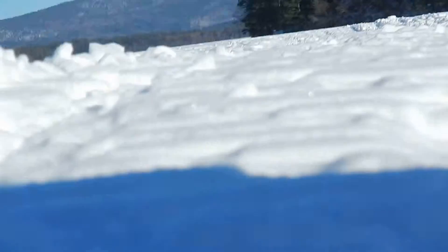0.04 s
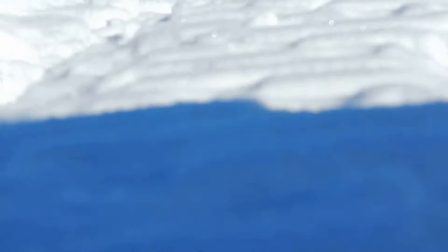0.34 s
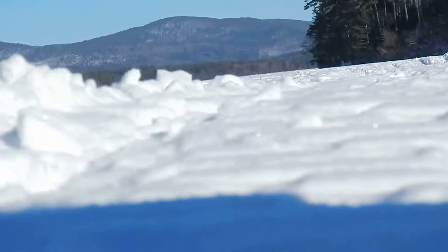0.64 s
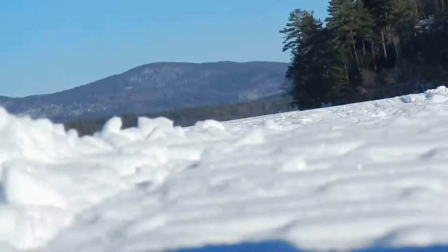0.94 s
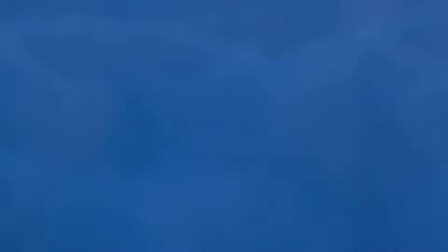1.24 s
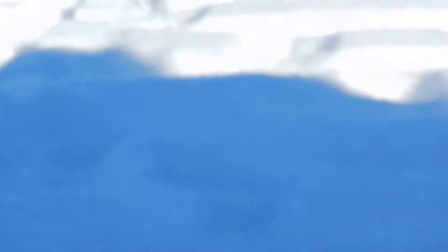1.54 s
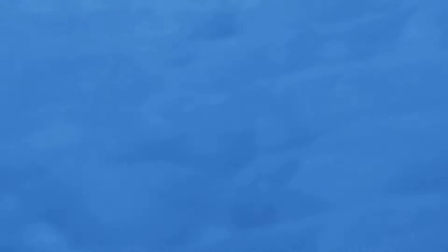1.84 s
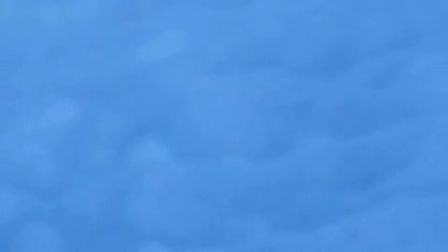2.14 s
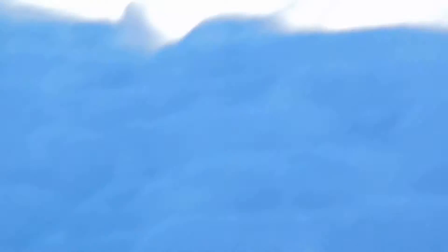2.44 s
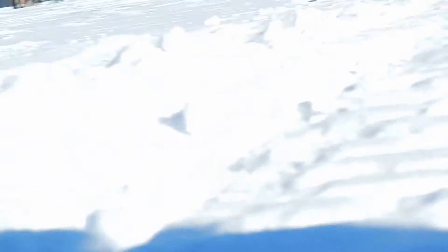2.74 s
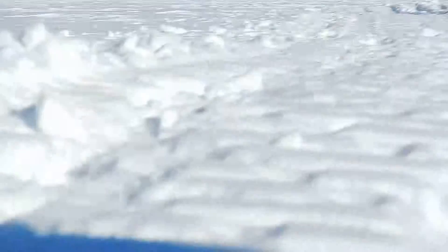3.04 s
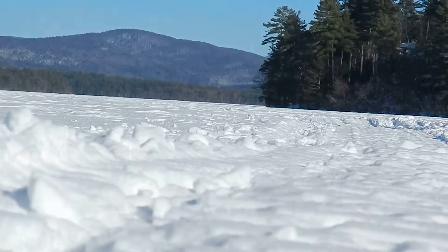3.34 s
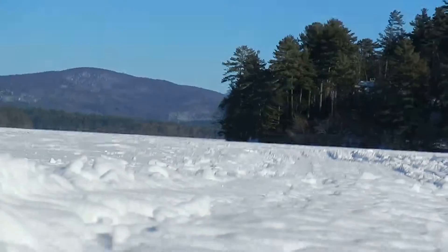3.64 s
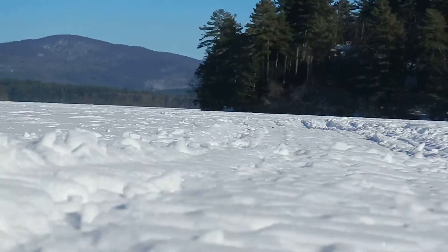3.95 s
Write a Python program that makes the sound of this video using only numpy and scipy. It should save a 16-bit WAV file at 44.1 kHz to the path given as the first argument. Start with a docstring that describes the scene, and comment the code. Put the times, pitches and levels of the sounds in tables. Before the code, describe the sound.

Close crunching footsteps in snow, with rustling clothes and a distant idling engine.

```python
"""Boots crunch in cold snow on a frozen lake, close to a hand-held camera; clothing rustles, and a low
throb, probably a distant idling engine, runs throughout under light wind. In the first second the snow
fractures and squeals underfoot, and faint lens peeps begin. After a lull in the steps, fingers click on
the case at about 2 s; the engine starts to lope and misfires three times as the boots scuff again.
A few softer steps end the scene. All is heard through the notched colour of the microphone ports."""
import sys
import numpy as np
from scipy import signal
from scipy.fft import rfft, irfft
from scipy.io import wavfile
from scipy.ndimage import uniform_filter1d

SR = 44100
rng = np.random.default_rng(int(sys.argv[2]) if len(sys.argv) > 2 else 0)


def unload_wav(signal):
    """Save mono or channel-first audio to the path in sys.argv[1] as 16-bit WAV at rate SR, clipped to [-1, 1]."""
    wavfile.write(
        sys.argv[1],
        SR,
        np.round(np.clip(np.atleast_2d(signal).T, -1, 1) * 32767).astype(np.int16),
    )


N = 176400
T = np.arange(N) / SR
SHARED_ONLY = np.array([[1], [0]])  # sources have two streams: common to both ports, and their difference

# spectra of wind rumble and still-air hiss (frequency [Hz], relative level [dB])
WIND_SPECTRUM = [(20, -14), (65, 5), (130, -1), (260, -13.5), (800, -63.5)]
HISS_SPECTRUM = [(120, 19), (300, 2.5), (600, -5.5), (2000, -17.5), (2550, 2.5), (2900, -22.5), (4400, -5),
                 (7000, -32), (9000, -22), (16000, -18.5)]

# engine speed (time [s], rate [cycles/s])
ENGINE_SPEED = [(0, 22.3), (.7, 22.275), (1.25, 23.144), (1.85, 24.343), (2.4, 23.674), (3.05, 23.057),
                (3.55, 22.338), (4, 21.883)]
# strength of the throb (time [s], level [dB])
THROB_LEVEL = [(0, -23), (.15, -22), (.5, -13.5), (.56, -19), (.66, -20), (.78, -15.5), (.91, -16.5),
               (.96, -21), (1.05, -17), (1.2, -26.5), (1.4, -23.5), (1.85, -15.5), (2.3, -15),
               (2.45, -16.5), (2.66, -14), (2.69, -24.5), (2.87, -27), (3.12, -18), (3.65, -14.5), (4, -15)]
# unevenness of firing (time [s], roughness [factor])
ROUGHNESS = [(1.95, 0.08), (2.4, .5), (3.6, 0.3), (3.85, 1.5)]
# exhaust resonance (frequency [Hz], relative level [dB])
EXHAUST_SPECTRUM = [(22, -39), (45, -28), (68, -21), (90, 4), (113, 2.5), (136, 0.5), (160, -5.5),
                    (185, -12), (225, -25.5), (300, -38), (500, -59), (1500, -86.5)]
# misfires (time [s])
MISFIRE_TIMES = [2.338, 2.45, 2.778]

# finger clicks and soft bumps of the hand (time [s], level [dB], decay [s])
CASE_CLICKS = [(1.994, -14, 0.0032), (2.136, -20, 0.0012), (2.158, -25.5, 0.013), (2.17, -19.5, 0.0034),
               (2.965, -26.5, 0.0014)]
HAND_BUMPS = [(2.155, -37, 0.046), (2.67, -35.5, 0.004), (3.357, -31.5, 0.0015)]
# spectra of those clicks and bumps (frequency [Hz], relative level [dB])
CASE_SPECTRUM = [(200, -26.5), (700, -17.5), (1350, -1), (1800, -7), (2700, -11.5), (4200, -19),
                 (6000, -26.5), (15000, -56)]
HAND_SPECTRUM = [(100, -12.5), (350, 6.5), (800, 4), (1500, -17.5), (3500, -30), (12000, -64)]
# peeps of the lens drive (centre time [s], level [dB])
LENS_PEEPS = [(.344, -49), (.945, -50), (1.028, -47), (1.347, -50), (1.45, -48.5), (1.497, -48),
              (1.527, -48), (1.809, -41), (2.058, -38), (2.086, -41), (2.127, -46), (2.241, -42),
              (2.282, -39), (3.271, -45.5), (3.686, -45)]

# rustle of clothing (time [s], level [dB])
RUSTLE_LEVEL = [(0, -40), (.3, -53), (.56, -50), (.9, -34), (.98, -52.5), (1.15, -33), (1.33, -58),
                (1.545, -56), (1.555, -43.5), (1.95, -37.5), (2.1, -44), (2.19, -30), (2.27, -45.5),
                (2.35, -36), (2.44, -37), (2.68, -36), (2.72, -50), (2.98, -39.5), (3.22, -36.5),
                (3.3, -49.5), (3.59, -51.5), (3.65, -35.5), (3.7, -47.5), (4, -39)]
# spectrum of rubbing fabric (frequency [Hz], relative level [dB])
CLOTH_SPECTRUM = [(150, 10.5), (350, 2), (700, -3), (1500, -3.5), (2600, -5), (4300, -6.5), (6000, -13),
                  (7300, -17), (8300, -25.5), (11500, -27), (16000, -29.5)]

# squeals of snow under full weight (start [s], length [s], level [dB])
SNOW_SQUEALS = [(0.54, 0.025, -22), (0.61, 0.024, -24.5), (0.679, 0.042, -24.5)]
# pushes of a boot, in relative levels (start [s], length [s], crunch [dB], grit [dB], powder [dB])
BOOT_PUSHES = [(-.02, 0.046, -27, -24.5, -33.5), (0.031, 0.071, -28.5, -27, -39),
               (0.124, 0.094, -28.5, -27.5, -37.5), (0.269, 0.066, -44, -38.5, -46.5),
               (0.411, 0.064, -39, -32, -46.5), (0.477, 0.051, -44.5, -38.5, -54),
               (0.528, 0.053, -24.5, -22, -43), (0.597, 0.046, -25, -19.5, -38),
               (0.669, 0.036, -29.5, -23.5, -50), (0.701, 0.13, -41.5, -33, -41.5),
               (0.812, 0.041, -26, -22.5, -37), (0.862, 0.06, -47, -32.5, -43.5),
               (1.037, 0.11, -34, -29, -44), (1.073, 0.072, -31.5, -22.5, -57),
               (1.142, 0.057, -31, -20.5, -65), (1.195, 0.033, -39, -34.5, -47),
               (1.955, 0.091, -44.5, -40.5, -53), (2.032, 0.18, -62.5, -50.5, -52),
               (2.464, 0.072, -79, -34, -38), (2.549, 0.1, -40, -30.5, -44),
               (2.654, 0.021, -31.5, -17.5, -21), (2.758, 0.054, -45.5, -23.5, -26),
               (2.841, 0.029, -41, -15.5, -28), (2.878, 0.089, -40.5, -34, -45.5),
               (2.95, 0.084, -38, -31.5, -38), (3.066, 0.047, -78, -36, -44.5),
               (3.122, 0.11, -44.5, -32, -43), (3.608, 0.059, -40, -33.5, -44),
               (3.693, 0.069, -44, -38.5, -47.5), (3.784, 0.26, -50, -42, -50.5)]
# spectra of packing snow, ice grit, loose powder and snapping crust (frequency [Hz], relative level [dB])
CRUNCH_SPECTRUM = [(150, -7.5), (400, -4.5), (750, -10), (1150, -3), (1600, -1.5), (2050, -4), (2500, 0.5),
                   (2850, 1.5), (3600, -59.5), (7000, -99)]
GRIT_SPECTRUM = [(1000, -65), (2500, -11.5), (3800, 0.5), (4450, 0.5), (5200, -5), (6000, 0.5), (7200, -3),
                 (8100, -18), (11000, -22)]
POWDER_SPECTRUM = [(4000, -70), (6800, 9.5), (7900, 15), (9300, 6.5), (11000, -2.5), (14000, -15.5),
                   (16000, -32)]
SNAP_SPECTRUM = [(500, -23.5), (1500, -5.5), (4300, -2.5), (7200, 5.5), (9000, -18), (15000, -48)]
# resonances of packing snow (frequency [Hz], bandwidth [Hz], gain [dB])
SNOW_RESONANCES = [(1163, 840, -5), (2090, 135, 7), (4620, 290, 4.5)]
# single snaps of the crust (time [s], level [dB])
CRUST_SNAPS = [(0.143, -24.5), (0.26, -30), (0.289, -29.5), (0.333, -31.5), (0.469, -38), (0.544, -17),
               (0.623, -26.5), (.69, -29.5), (.923, -23), (1.044, -43), (1.135, -24), (2.484, -24.5),
               (2.671, -12), (2.771, -28), (2.855, -23), (2.98, -23.5), (3.649, -29)]

# the two microphone ports (frequency [Hz], coherence [0-1], left phase lag [rad], left minus right [dB])
PORT_RESPONSE = [(40, 0.6, 0.38, -3.5), (152, .999, 0.08, 1), (330, 0.73, 0.28, -1),
                 (1280, 0.69, 0.13, -2.5), (2670, 0.75, 0.47, 2.5), (3580, 0.3, 2.27, -0.5),
                 (8060, 0, 1.24, 1.5), (15000, 0.5, 3.5, 0.5)]
# notches of the port cavities (frequency [Hz], bandwidth [Hz], gain [dB])
PORT_NOTCHES = [(3186, 530, -20.5), (4830, 685, -32)]


def undb(db):
    return 10 ** (np.asarray(db) / 20)


def unit(x):
    return x / np.sqrt(np.mean(x ** 2))


def curve(rows):
    """Linear interpolation in time through (time [s], value) rows."""
    return np.interp(T, *np.array(rows).T)


def over_hz(rows, hz):
    """Interpolation of a table's columns on a log-frequency axis."""
    rows = np.array(rows, float)
    return [np.interp(np.log(hz + 1), np.log(rows[:, 0]), col) for col in rows.T[1:]]


def colour(x, spectrum, size=8192):
    """Minimum-phase filtering: folding the cepstrum gives a causal response with the given spectrum."""
    level_db = over_hz(spectrum, np.fft.rfftfreq(size, 1 / SR))[0]
    cepstrum = irfft(np.log(undb(level_db)))
    cepstrum[1:size // 2] *= 2
    cepstrum[size // 2 + 1:] = 0
    response = irfft(np.exp(rfft(cepstrum)))[:size // 2]
    return signal.fftconvolve(np.atleast_2d(x), response[None], axes=1)[:, :N]


def ring(x, hz, width):
    """Second-order resonance, of gain 1 at its centre."""
    return signal.lfilter(*signal.iirpeak(hz, hz / width, fs=SR), x)


def flutter(per_s):
    """Random modulation of unit RMS: ramps join per_s random values a second."""
    hold = max(int(SR / per_s), 1)
    held = np.repeat(rng.standard_normal(N)[:N // hold + 1], hold)
    return unit(uniform_filter1d(held, hold)[:N])


def grains(per_s, spread_db, bed):
    """Shot noise: random impulses of unequal size, timed alike in both streams, over a smooth bed."""
    occurs = rng.random(N) < per_s / SR
    sizes = occurs * undb(spread_db * np.minimum(rng.exponential(size=N), 5))
    return unit(unit(sizes * rng.standard_normal((2, N))) + bed * rng.standard_normal((2, N)))


def impacts(rows, spectrum):
    """Damped impacts: bursts of coloured noise start suddenly and decay exponentially."""
    envelope = sum(undb(db) * (T >= at) * np.exp(-np.abs(T - at) / decay) for at, db, decay in rows)
    noise = rng.standard_normal((2, N))
    return colour(noise * envelope, spectrum) / np.std(colour(noise, spectrum))


def air(wind_db=-35.5, gust_db=3, hiss_db=-54.5):
    """Turbulence: light gusts modulate a low rumble over a faint steady hiss."""
    rumble = unit(colour(rng.standard_normal((2, N)), WIND_SPECTRUM))
    rumble *= undb(wind_db + gust_db * flutter(per_s=2.6))
    hiss = unit(colour(rng.standard_normal((2, N)), HISS_SPECTRUM))
    return rumble + hiss * undb(hiss_db)


def engine(misfire_s=.06, slip_cycles=.32, misfire_db=-2, echo_s=.0202, echo_db=-6.5):
    """Pulse excitation of a resonator: each firing and its reflection thump through the exhaust."""
    # each misfire brings the next firing early by part of a cycle
    slips = sum(np.clip((T - at) / misfire_s + .5, 0, 1) for at in MISFIRE_TIMES)
    phase = np.cumsum(curve(ENGINE_SPEED)) / SR + slip_cycles * slips
    cycle = np.arange(int(phase[-1]) + 1)
    due = np.interp(cycle + .073, phase, T)
    level_scatter, time_scatter = rng.standard_normal((len(cycle), 2)).T
    roughness = np.interp(due, *np.array(ROUGHNESS).T)
    misfired = sum(np.abs(due - at) < (misfire_s - echo_s) / 2 for at in MISFIRE_TIMES)
    lope = np.where(cycle % 2, -3, 1)  # every other firing falters
    strength = undb(roughness * (lope + .5 * level_scatter) + misfire_db * misfired)
    fired = due + .0003 * roughness * time_scatter
    pulses = np.zeros(2 * N)
    for when, push in ((fired, strength), (fired + echo_s, strength * undb(echo_db))):
        np.add.at(pulses, np.abs(when * SR).astype(int), -push)
    return unit(colour(pulses, EXHAUST_SPECTRUM)) * undb(curve(THROB_LEVEL)) * SHARED_ONLY


def camera(peep_hz=2510, spread_hz=11, peep_s=.005, flutter_db=3.5):
    """Structure-borne sound: fingers click and bump on the case; the lens drive gives rounded peeps."""
    peeps = np.zeros(N)
    for (at, db), detune in zip(LENS_PEEPS, rng.standard_normal(len(LENS_PEEPS))):
        envelope = undb(db) * np.exp(-((T - at) / peep_s) ** 2)
        peeps += envelope * np.sin(2 * np.pi * (peep_hz + spread_hz * detune) * T)
    peeps *= undb(flutter_db * flutter(per_s=220))
    return impacts(CASE_CLICKS, CASE_SPECTRUM) + impacts(HAND_BUMPS, HAND_SPECTRUM) + peeps * SHARED_ONLY


def clothing(flutter_db=1.8):
    """Friction noise: many tiny contacts of fabric merge into a soft rustle."""
    fibres = grains(per_s=6000, spread_db=1.0, bed=.72) * undb(flutter_db * flutter(per_s=90))
    return unit(colour(fibres, CLOTH_SPECTRUM)) * undb(curve(RUSTLE_LEVEL))


def squeals(start_hz=1900, width_hz=300, rise_hz_per_s=6000, slips_per_s=600):
    """Stick-slip friction: each slip of the sole rings a resonance that rises as the snow stiffens."""
    out = np.zeros(N)
    slips = (rng.random(N) < slips_per_s / SR) * np.exp(2j * np.pi * rng.random(N))
    ringing = signal.lfilter([1], [1, -np.exp(-np.pi * width_hz / SR)], slips)
    for start, length, db in SNOW_SQUEALS:
        now = (T >= start) & (T < start + length)
        age = T[now] - start
        glide = np.exp(2j * np.pi * age * (start_hz + rise_hz_per_s * age / 2))
        envelope = np.abs(np.sin(np.pi * age / length)) ** .5
        out[now] += undb(db) * unit((ringing[now] * glide).real * envelope)
    return out * SHARED_ONLY


def footsteps(attack_s=.027, release_s=.012, detune_spread=.05, snap_s=.0027):
    """Brittle fracture: each push breaks a shower of grains that rings the snow, and the crust snaps."""
    shower = grains(per_s=2200, spread_db=1.8, bed=.5)
    spectra = (CRUNCH_SPECTRUM, GRIT_SPECTRUM, POWDER_SPECTRUM)
    layers = np.array([unit(colour(shower, spectrum)) for spectrum in spectra])
    out = np.zeros((2, N))
    for start, length, *layer_db in BOOT_PUSHES:
        now = (T >= start) & (T < start + length + 10 * release_s)
        age = T[now] - start
        attack = np.clip(age / attack_s + .05, 0, 1)
        release = np.exp(-np.maximum(age - length + release_s / 2, 0) / release_s)
        push = np.tensordot(undb(layer_db), layers[:, :, now], 1) * attack * release
        out[:, now] += .67 * push
        for hz, width, db in SNOW_RESONANCES:  # each push squeaks at slightly different pitches
            detune = np.exp(detune_spread * rng.standard_normal())
            out[:, now] += undb(db) * ring(push, hz * detune, width)
    return out + impacts([(at, db, snap_s) for at, db in CRUST_SNAPS], SNAP_SPECTRUM)


def ports(streams):
    """Partial coherence: sum and difference of the streams give left and right; the left lags in phase."""
    coherence, lag, balance_db = over_hz(PORT_RESPONSE, np.fft.rfftfreq(N, 1 / SR))
    shared, apart = rfft(streams) * np.sqrt([(1 + coherence) / 2, (1 - coherence) / 2])
    lean = undb(balance_db / 2) * np.exp(-.5j * lag)
    return irfft([(shared + apart) * lean, (shared - apart) / lean], N)


def scene():
    """Superposition: all sources add at the microphone ports."""
    return ports(engine() + footsteps() + squeals() + clothing() + camera() + air())


def record(dry, cutoff_hz=15750):
    """Cavity resonance: the ports cut two notches; a steep low-pass then removes the top."""
    for hz, width, db in PORT_NOTCHES:
        dry = dry - (1 - undb(db)) * ring(dry, hz, width)
    return signal.sosfilt(signal.ellip(10, .2, 80, cutoff_hz, fs=SR, output="sos"), dry)


dry = scene()
out = record(dry)
unload_wav(out)
```